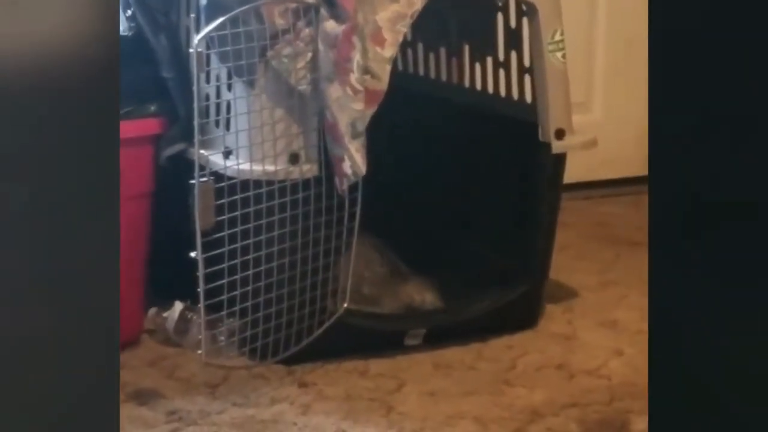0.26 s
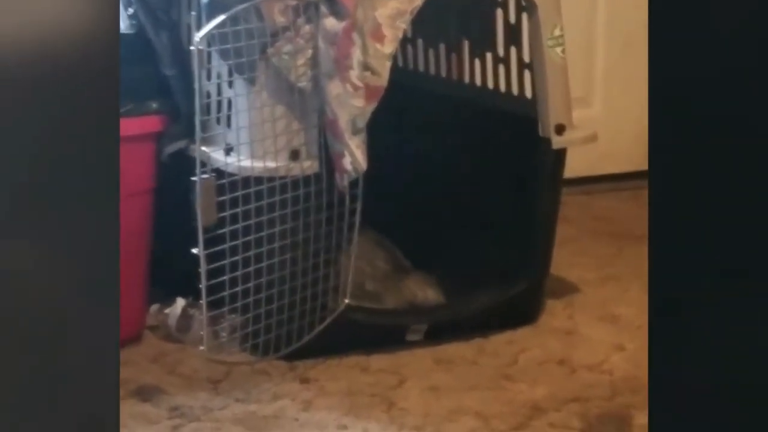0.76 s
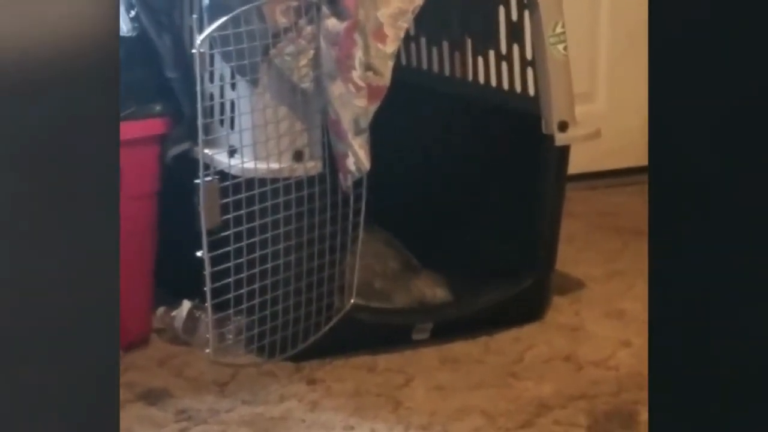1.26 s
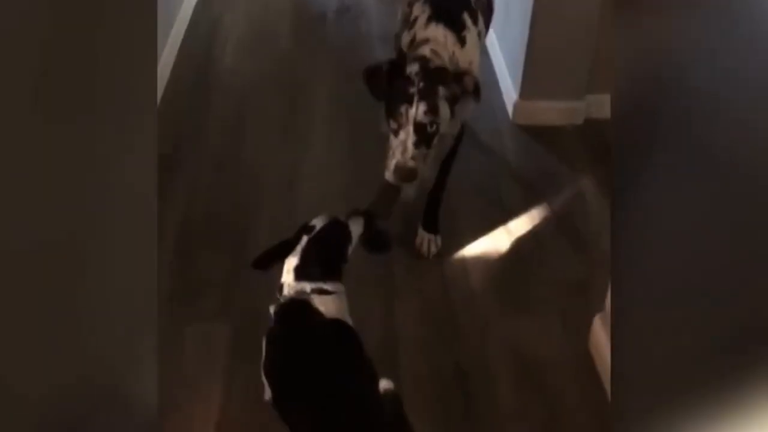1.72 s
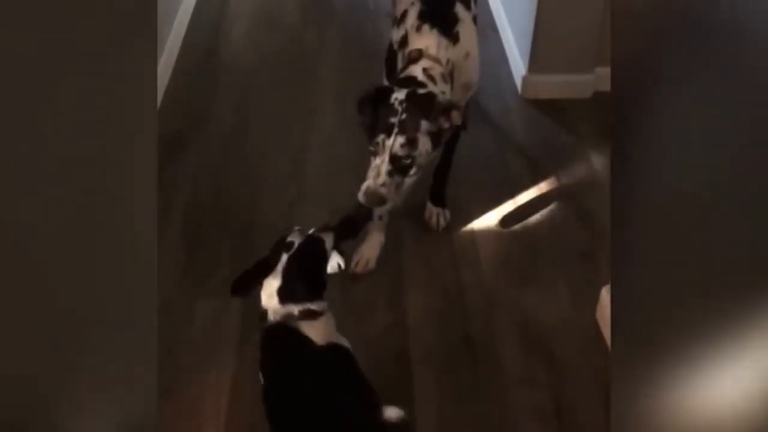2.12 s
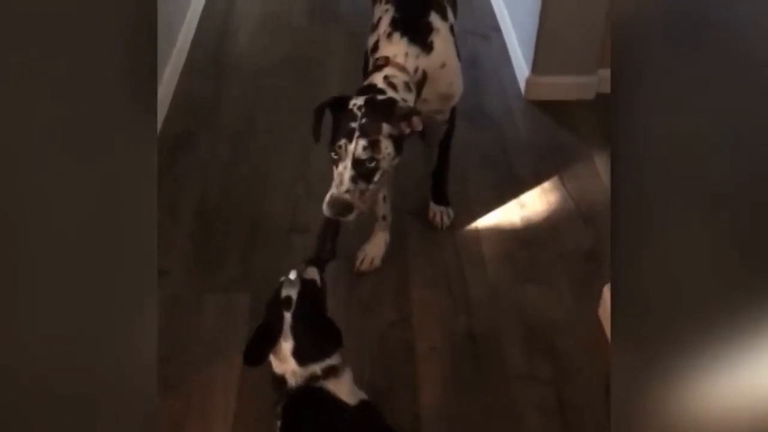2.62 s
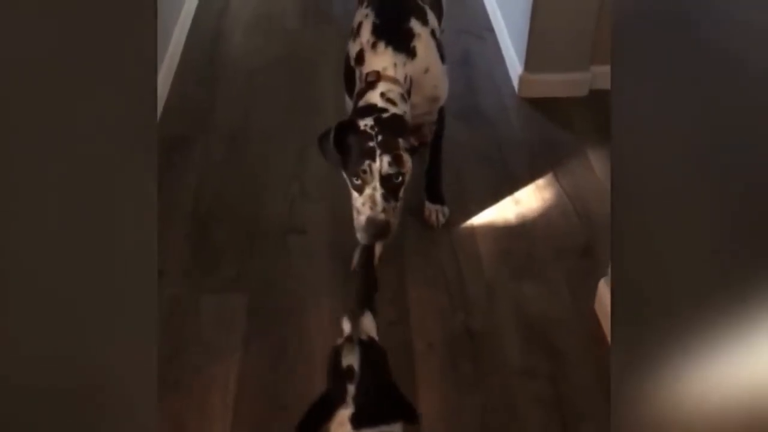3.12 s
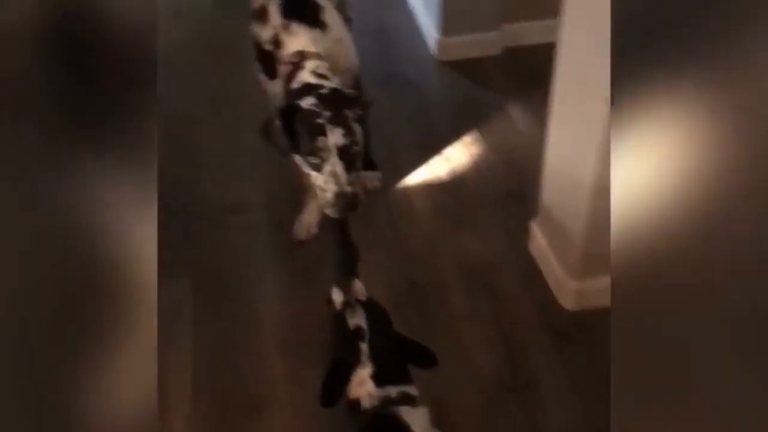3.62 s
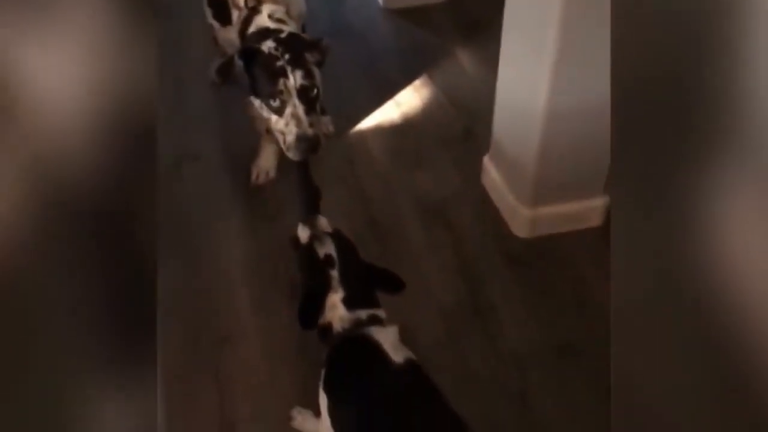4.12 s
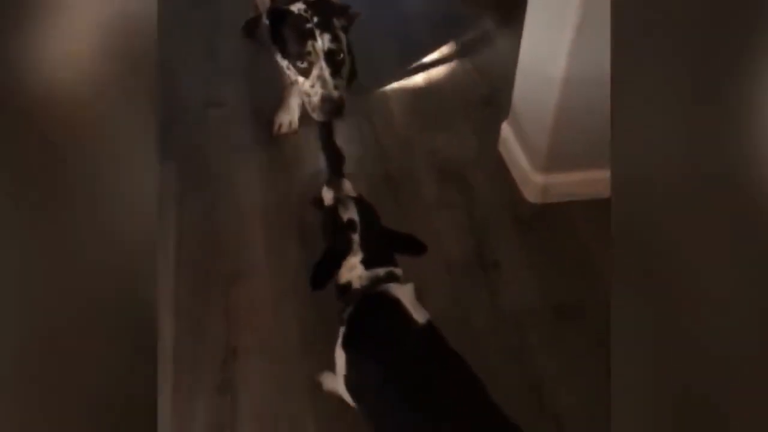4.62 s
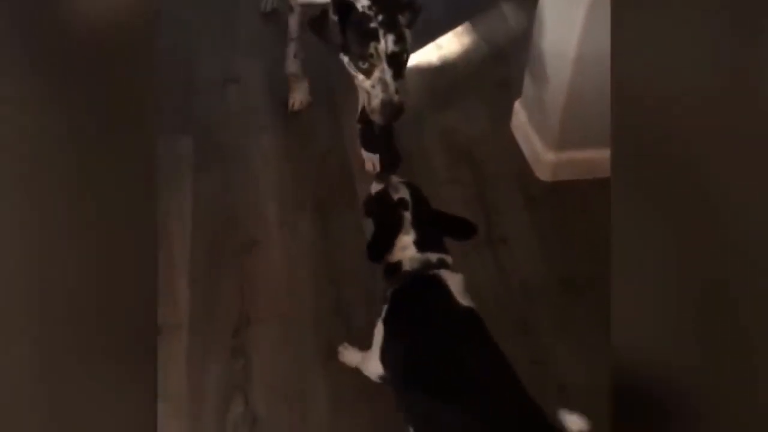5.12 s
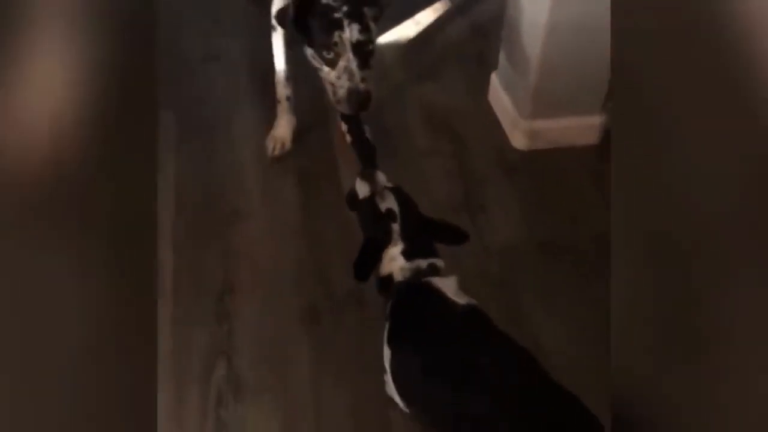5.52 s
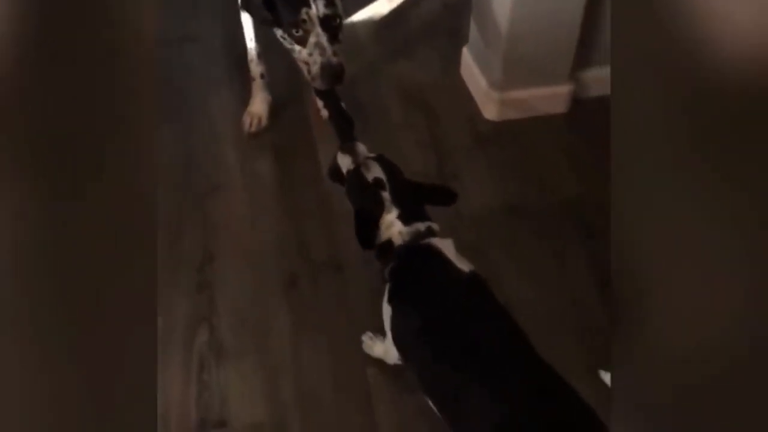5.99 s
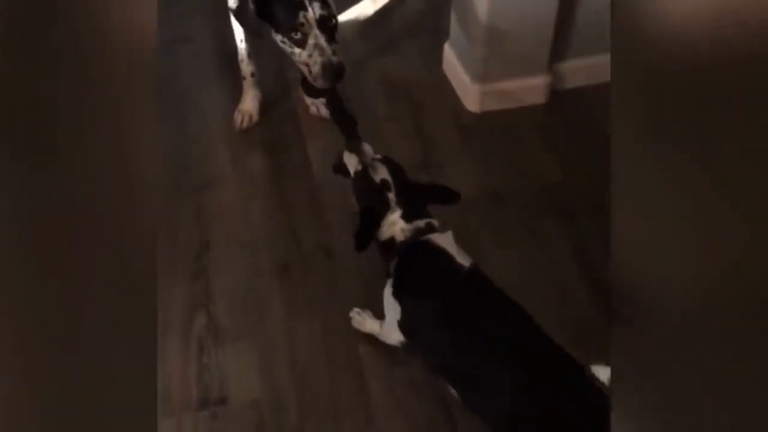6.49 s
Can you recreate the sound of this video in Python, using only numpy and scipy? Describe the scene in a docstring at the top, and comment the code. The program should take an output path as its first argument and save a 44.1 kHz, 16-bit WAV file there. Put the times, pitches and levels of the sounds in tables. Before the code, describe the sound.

A cat meows in a bumped carrier as a toy squeaks, then a big dog growls while tugging a rope, with snorts and claw ticks.

```python
"""A small room with a mains hum, in stereo. Near the microphone, a little left, a cat meows in a carrier
that gets bumped; a little right, a squeezed rubber toy puffs air and squeaks through its reed.
Then another room, in mono, over the rumble of the house: a big dog growls four times through a rope
in its teeth, vocal folds pulsing and soft palate flapping. Two dogs snort with the effort,
claws tick and skid on the boards and a collar tag rings faintly."""
import sys
import numpy as np
from scipy import signal
from scipy.fft import rfft, irfft
from scipy.io import wavfile
from scipy.ndimage import uniform_filter1d

SR = 44100
rng = np.random.default_rng(int(sys.argv[2]) if len(sys.argv) > 2 else 0)


def pcm_store(signal):
    """Save signal as 16-bit PCM."""
    levels = np.round(np.clip(np.atleast_2d(signal), -1, 1) * 32767)
    wavfile.write(sys.argv[1], SR, levels.astype(np.int16).T)


N = 297675
TIME = np.arange(N) / SR


def amp(db):
    return 10 ** (np.asarray(db) / 20)


def unit_rms(x):
    return x / np.sqrt(np.mean(x ** 2) + 1e-20)


def add(mix, start, sound):
    part = mix[round(start * SR):][:len(sound)]
    part += sound[:len(part)]


def controls(rows):
    """Start time, and the other columns sample by sample."""
    times, *columns = np.transpose(rows)
    t = np.arange(times[0], times[-1], 1 / SR)
    return times[0], [np.interp(t, times, column) for column in columns]


def curve_at(points, hz):
    freqs, values = np.transpose(points)
    return np.interp(np.log(hz + 1), np.log(freqs + 1), values)


def noise(shape, size):
    """Noise of rms 1, coloured by (Hz, dB) points."""
    spectrum = rfft(rng.standard_normal(size))
    return unit_rms(irfft(spectrum * amp(curve_at(shape, np.fft.rfftfreq(size, 1 / SR))), size))


def wobble(hz, size):
    """Random drift of rms about 1, mostly slower than hz."""
    knots = rng.standard_normal(int(size / SR * 400) + 400)
    knots = unit_rms(signal.lfilter([1], [1, -np.exp(-2 * np.pi * hz / 400)], knots)[200:])
    return np.interp(np.arange(size) / SR * 400, np.arange(len(knots)), knots)


def resonate(x, hz, width):
    """A resonance that may move: shift hz down to zero, smooth, shift back."""
    turn = np.exp(2j * np.pi * np.cumsum(hz * np.ones(x.shape[-1])) / SR)
    pole = np.exp(-np.pi * width / SR)
    return 2 * (turn * signal.lfilter([1 - pole], [1, -pole], x / turn + 1e-18)).real


def formant(x, hz, width, widen=2):
    """Two resonances in series, for steeper sides."""
    return resonate(resonate(x, hz, width), hz, widen * width)


def hump(hz, centre, width):
    return 1 / (1 + (2 * (hz - centre) / width) ** 2)


def swell(t, middle, half):
    return np.cos(np.pi / 2 * np.clip((t - middle) / half, -1, 1)) ** 2


def ring(db, hz, sag, t60, rise_ms):
    """One dying mode with a soft start."""
    t = np.arange(round(t60 * SR)) / SR
    attack = (1 - np.exp(-t * 1000 / rise_ms)) ** 2
    return amp(db - 60 * t / t60) * attack * np.sin(2 * np.pi * (hz - sag * t / 2) * t)


# Room tone in the small room. Each row: frequency in Hz, relative level in dB.
SMALL_ROOM_TONE = [(18, -31), (40, 1.5), (70, -7.5), (120, -9), (230, 1), (350, -4.5), (500, -20.5),
                   (900, -29), (1700, -24.5), (3000, -37), (16000, -32.5)]

def small_room_tone(hum_hz=120, hum_db=-56.5):
    """Mains hum and rumble in the centre, a faint hiss spread wide."""
    hum = amp(hum_db + 2.4 * wobble(12, N)) * np.sqrt(2) * np.sin(2 * np.pi * hum_hz * TIME)
    rumble = noise(SMALL_ROOM_TONE, N)
    hiss = resonate(np.array([noise(SMALL_ROOM_TONE, N) for _ in range(2)]), 1100, 3800)
    return hum + amp(-67) * (rumble + 2 * hiss)


# The toy's air, close by. Each row: frequency in Hz, relative level in dB.
TOY_AIR = [(300, -27), (1000, 6.5), (2500, 1.5), (5000, 1.5), (8000, -3.5), (12000, -8), (16000, -14.5)]
# Each row: middle of a puff in seconds, half length in seconds, level in dB.
TOY_PUFFS = [(.005, 0.073, -41.5), (0.213, 0.065, -49.5), (0.336, 0.02, -37.5), (0.48, 0.029, -36),
             (0.556, 0.019, -44.5)]

def toy_puffs():
    """Air leaves the toy in puffs that swell and fade."""
    return noise(TOY_AIR, N) * sum(amp(db) * swell(TIME, at, half) for at, half, db in TOY_PUFFS)


# The carrier, dead centre. Each row: start in seconds, level in dB, pitch in Hz,
# sag in Hz per second, seconds to fall 60 dB.
CARRIER_BUMPS = [(0.047, -12.5, 346.4, 1105, 0.2), (0.701, -16.5, 275, 517, 0.063),
                 (1.33, -25.5, 154, 101.1, 0.11)]
# The knock in each bump. Each row: frequency in Hz, relative level in dB.
CARRIER_THUD = [(60, -29), (150, 17.5), (350, 16), (700, 0.5), (1500, -45)]

def carrier_bumps():
    """The bumped carrier knocks dully, and its pitch sags as it rings."""
    bumps, n = np.zeros(N), np.arange(2000)
    envelope = np.exp(-n / 600) * np.minimum(n / 350, 1)
    for start, db, hz, sag, t60 in CARRIER_BUMPS:
        add(bumps, start, ring(db, hz, sag, t60, rise_ms=140 * t60))
        add(bumps, start, amp(db - 20.5) * noise(CARRIER_THUD, len(n)) * envelope)
    return bumps


# The cat, near and left. Each row: time in seconds, pitch in Hz, throat level in dB, mouth level in dB.
CAT_MEOW = [(.05, 359, -58.5, -62.5), (.11, 411.3, -53, -56), (.15, 452, -54, -48.5), (.21, 475, -57, -49),
            (.26, 451, -57, -50.5), (.3, 459, -54.5, -59), (.46, 450.6, -60, -66), (.52, 401, -46, -62),
            (.576, 436.4, -43, -36), (.65, 446.5, -35.5, -32.5), (.72, 452.4, -34.5, -38),
            (.785, 466.3, -53, -37.5), (.845, 445.4, -25.5, -39.5), (.905, 425.8, -43, -33),
            (.97, 416, -29, -49.5), (1.03, 396.3, -26, -52.5), (1.13, 386.6, -29, -46.5),
            (1.2, 367, -37, -48.5), (1.25, 316.8, -36, -67.5), (1.31, 292.9, -49, -65),
            (1.42, 272.8, -62, -100)]

def meow(waver=.003):
    """Harmonics ring the throat and the mouth, whose resonance the opening jaw raises; it ends hoarse."""
    start, (hz, throat_db, mouth_db) = controls(CAT_MEOW)
    size = len(hz)
    t = start + np.arange(size) / SR
    mouth_hz = np.interp(t, (.379, .75, .9, 1.201), (1877, 2120, 2418, 2530))
    mouth_width = np.interp(t, (.75, .9), (1760, 765))
    hoarse = np.interp(t, (1.21, 1.34), (.2, .93))
    jitter = (.0013 + .05 * hoarse ** 2) * wobble(40, size)
    turns = np.cumsum(hz * (1 + jitter + waver * wobble(7, size))) / SR
    # The fundamental thins as the mouth opens, grows with the throat and dies at the end.
    first_db = -49 - .45 * (np.clip(mouth_db, -52, -30) + 43.5) + .25 * (throat_db + 41)
    first_db += 7.7 * hump(hz, 330, 54) - 276 * np.maximum(t - 1.354, 0)
    voice = amp(first_db + 2.5 * wobble(4.6, size)) * np.sin(2 * np.pi * turns)
    for k in range(2, 28):
        f = k * hz
        treble = .0069 * hump(f, 4750, 900) ** 2 + .0017 * hump(f, 6400, 1500) ** 2
        treble *= amp(6.1 * wobble(11, size))
        throat = hump(f, 750, 600) ** 2 + .023 * hump(f, 980, 380) ** 2 + treble
        mouth = hump(f, mouth_hz, mouth_width) ** 2 + amp(-14) * hump(f, 1350, 300) ** 2
        mouth += .013 * hump(f, 6000, 2500) ** 2
        gain = amp(throat_db + .66 * wobble(8.2, size)) * throat
        gain += amp(mouth_db + 8.6 * uniform_filter1d(wobble(18, size), 1500)) * mouth
        voice += gain * np.sin(2 * np.pi * (k * turns + rng.random()))
    air = noise([(200, -6.5), (900, -8), (1800, -8), (2700, 1.5), (3500, -15), (6000, -12.5),
                 (8000, -28.5)], size)
    breath = amp(throat_db - 21) * hoarse * air
    return start, (np.sqrt(2) * voice + breath) * signal.windows.tukey(size, .04)


# The toy, near and right, one list a squeak. Each row: time in seconds, pitch in Hz, level in dB.
TOY_SQUEAKS = [
    [(.055, 914, -54), (.09, 984, -55), (.135, 983, -49.5), (.17, 993, -53.5), (.205, 945, -61),
     (.24, 907, -60.5), (.285, 850, -77)],
    [(.303, 1079, -44), (.32, 1115, -45.5), (.342, 1253, -37.5), (.366, 1333, -36), (.392, 1330, -39.5),
     (.41, 1275, -35), (.44, 1254, -38), (.462, 1157, -40), (.505, 1092, -52.5)],
    [(.515, 1023, -42.5), (.535, 1022, -45), (.63, 1006, -52.5), (.705, 1001, -50.5), (.74, 948, -52),
     (.78, 927, -57)],
    [(1.6, 1196, -106.5), (1.625, 1310, -86), (1.652, 1380, -72.5)],
]
# The reed's colour. Each row: frequency in Hz, gain in dB.
REED_COLOUR = [(1000, -5.5), (1400, -14), (2600, 1.5), (4000, 0), (5300, -4.5), (6500, -7), (9000, -8.5),
               (16000, -11.5)]

def squeak(rows, rasp=.045):
    """The reed buzzes and air hisses past; a harder squeeze makes the overtones shiver more."""
    start, (hz, tone_db) = controls(rows)
    size = len(hz)
    db_per_khz = -.87 - .058 * (tone_db + 45)
    push = 1 + 3.2 * amp(tone_db + 35)
    jitter = (.0024 + .18 * amp(tone_db)) * wobble(93, size)
    turns = np.cumsum(hz * (1 + jitter)) / SR
    reed = np.zeros(size)
    for k in range(1, 17):
        f = k * hz
        db = curve_at(REED_COLOUR, f) + db_per_khz * (f / 1000 - 6) + 3.46 * wobble(30, size)
        shiver = 1 + rasp * push * np.sqrt(k) * wobble(260, size)
        phase = 2 * np.pi * (k * turns + rng.random()) + rasp * push * k * wobble(260, size)
        reed += amp(db) * (f < 17000) * shiver * np.sin(phase)
    leak = amp(-32.5) * push * noise(TOY_AIR, size)
    return start, amp(tone_db) * (np.sqrt(2) * reed + leak) * signal.windows.tukey(size, .07)


def reflections(x, t60, first_ms, channels):
    """The walls return sparse echoes of random sign that die away, each channel its own."""
    at = np.arange(0, SR // 2, 20) + rng.integers(0, 20, (channels, SR // 40 + 1))
    taps = np.zeros((channels, SR // 2 + 20))
    np.put_along_axis(taps, at, rng.choice([-1., 1.], at.shape), 1)
    t = np.arange(taps.shape[1]) / SR
    taps *= amp(-60 * t / t60) * (t > first_ms / 1000)
    return signal.fftconvolve(x[None], taps / np.linalg.norm(taps[0]), axes=1)[:, :N]


def at_microphone(x, left_db, lead):
    """Each microphone port hears a near source with its own level and phase."""
    phase = curve_at(lead, np.fft.rfftfreq(N, 1 / SR))
    sides = np.array([[1], [-1]])
    return irfft(rfft(x) * amp(left_db * sides) * np.exp(.5j * phase * sides), N)


# Cat and toy at the microphone. Each row: frequency in Hz, lead of the left port in radians.
CAT_PHASE = [(100, 0.1), (350, 0.03), (1100, 0.9), (2070, 0.36), (4900, -0.05), (16000, 0.1)]
TOY_PHASE = [(300, -0.2), (1300, 2.1), (2760, .1), (16000, -0.2)]
# The ports' balance. Each row: frequency in Hz, left over right in dB.
PORT_BALANCE = [(200, -4), (600, 5.5), (1300, 1), (4000, 0), (8000, -10.5), (15000, 0)]

def small_room():
    """The first room in stereo: cat left, toy right, the walls close behind them."""
    cat, toy = np.zeros((2, N))
    add(cat, *meow())
    for rows in TOY_SQUEAKS:
        add(toy, *squeak(rows))
    toy += toy_puffs()
    background = carrier_bumps() + small_room_tone()
    direct = at_microphone(cat, .76, CAT_PHASE) + at_microphone(toy, -1.5, TOY_PHASE)
    walls = reflections(cat, t60=.23, first_ms=1.5, channels=2)
    walls += reflections(toy, t60=.23, first_ms=3.1, channels=2)
    balance_db = curve_at(PORT_BALANCE, np.fft.rfftfreq(N, 1 / SR)) * [[.5], [-.5]]
    return irfft(rfft(direct + amp(-5.5) * walls) * amp(balance_db), N) + background


# The house, heard from the second room. Each row: frequency in Hz, relative level in dB.
HOUSE_RUMBLE = [(15, -52), (30, -60), (55, -3.5), (90, -16), (125, 1), (170, -2.5), (245, -15.5),
                (330, -18), (480, -28), (900, -24), (2000, -35), (5000, -42.5), (11000, -51), (16000, -86)]
# Each row: frequency of a mains tone in Hz, level in dB.
MAINS_TONES = [(60, -69.5), (119, -68.5), (237, -70.5), (352, -79.5), (411, -85)]

def house_tone():
    """The house rumbles under wavering mains tones."""
    rumble = amp(-58.5) * noise(HOUSE_RUMBLE, N)
    hum = sum(amp(db + 5 * wobble(16, N)) * np.sin(2 * np.pi * hz * TIME) for hz, db in MAINS_TONES)
    return rumble + hum


# Down on the boards. Each row: start in seconds, level in dB, resonance in Hz.
CLAW_TICKS = [(1.7, -54, 5500), (1.732, -59, 4260), (1.889, -56, 9000), (1.918, -48, 7840),
              (1.9587, -47.5, 4150), (2.921, -56, 4560), (3.5742, -52, 2770), (3.922, -69, 2750),
              (4.67, -59, 7000), (4.77, -46, 8640), (5.1251, -57, 5070), (5.271, -69, 7950),
              (5.281, -61, 7500), (5.529, -46, 6200), (5.574, -58, 5700), (5.692, -44.5, 2540)]

def claw_tick(db, hz):
    """A claw strikes a board: a tiny burst of noise through a broad resonance."""
    n = np.arange(400)
    strike = rng.standard_normal(400) * n * np.exp(-n / 30)
    return amp(db - 8.5) * unit_rms(formant(strike, hz, .45 * hz, widen=4 / 3))


# Both dogs. Each row: start in seconds, rise in seconds, level at the top in dB, fall in dB per second,
# treble over the body in dB, pitch of the air jet in Hz.
DOG_SNORTS = [(1.701, 0.036, -63, 609, -21, 2980), (1.79, 0.0061, -67.5, 115.5, -6.5, 6000),
              (1.887, 0.011, -56, 123.5, -6, 3650), (2.207, 0.011, -57.5, 60, -5, 3750),
              (2.478, 0.021, -51, 132.5, -5, 3850), (2.589, 0.028, -53, 152, -22, 5730),
              (2.799, 0.018, -56, 136, -5, 3800), (3.06, 0.0023, -68, 367.5, -11, 4500),
              (3.144, 0.016, -52.5, 116.5, -6, 4350), (3.322, 0.028, -58, 126, -2, 3150),
              (4.668, 0.012, -57.5, 192, -30, 5400), (4.771, 0.0047, -55, 129.5, -6.5, 4760),
              (5.047, 0.029, -62.5, 163.5, -8, 3420), (5.332, 0.07, -48.5, 104, -2.3, 6200),
              (5.626, 0.019, -58.5, 155, -8, 5600), (5.98, 0.064, -68.5, 170, -5, 5310),
              (6.5, 0.036, -70, 35, -6, 4020), (6.663, 0.0064, -60.5, 155.5, -38, 4370)]
# Each row: nostril resonance in Hz, width in Hz, relative level in dB.
NOSTRIL_FORMANTS = [(3140, 1100, 25), (4354, 610, 21.5), (2036, 1260, 15), (5140, 530, 19), (6080, 530, 18),
                    (8160, 190, 15), (920, 220, 22.5), (3800, 430, 20.5)]
# The treble of a snort. Each row: frequency in Hz, relative level in dB.
SNORT_FIZZ = [(3000, -67), (5500, -7.5), (7000, -8.5), (10000, -14.5), (16000, -33)]

def snort(rise, top_db, fall, colour_db, jet_hz):
    """Turbulent air forced through the nostrils climbs, holds briefly and falls, growing duller."""
    hold_end = 1.44 * rise
    t = np.arange(0, hold_end + 35.5 / fall, 1 / SR)  # until 35.5 dB down
    size = len(t)
    effort_db = top_db - 296 * np.maximum(rise - t, 0) - fall * np.maximum(t - hold_end, 0)
    bright_db = 12 * np.exp(-(t + rise) / .019) - 95 * np.maximum(t - rise, 0)
    white = rng.standard_normal(size)
    drift = 1 + .036 * wobble(2.9, size)
    nostrils = sum(amp(db) * formant(white, hz * drift, width) for hz, width, db in NOSTRIL_FORMANTS)
    jet = amp(bright_db - 13) * unit_rms(formant(white[::-1], jet_hz, 1050, widen=1))
    body = (unit_rms(nostrils) + jet) * amp(3 * wobble(90, size))
    fizz = noise(SNORT_FIZZ, size) * amp(colour_db + bright_db + 2.2 * wobble(60, size))
    n = np.arange(size)
    fades = np.clip(np.minimum(n / 80, n[::-1] / 300), 0, 1)
    return amp(effort_db) * (body + fizz) * fades


# At the collar, faint. Each row: start in seconds, level in dB.
TAG_CLINKS = [(1.989, -66), (2.045, -68), (2.39, -66)]

def collar_tag(db):
    """The tag rings in one high, brief mode."""
    return ring(db, hz=10050, sag=0, t60=.1, rise_ms=1)


# The big dog's throat. Each row: resonance in Hz, width in Hz, relative level in dB.
THROAT_FORMANTS = [(580, 104, -11), (696.5, 133, 0.5), (876, 145, 2.5), (1435, 430, -20),
                   (3200, 1100, -23.5)]

def dog_throat(drive, snarl_db, shift, tongue_hz, tongue_db):
    """Throat and tongue resonances, moved by the factor shift; a snarl lifts the third."""
    bands = THROAT_FORMANTS + [(tongue_hz, 240, tongue_db - 13.5)]
    parts = [amp(db) * unit_rms(formant(drive, hz * shift, width)) for hz, width, db in bands]
    parts[2] *= amp(snarl_db)
    power = sum(amp(2 * db) for _, _, db in THROAT_FORMANTS) + amp(2 * snarl_db) - 1
    return sum(parts) / np.sqrt(power)


# The big dog on the rope, one list a growl. Each row: time in seconds, effort in dB,
# pitch of the folds in Hz, snarl in dB.
DOG_GROWLS = [
    [(1.99, -89, 91.83, 30), (2.05, -50, 95.1, 20), (2.15, -46.5, 103.7, 2.5), (2.25, -50, 111.1, 6),
     (2.35, -48, 107.6, 6), (2.45, -43.5, 104.5, 3.5), (2.58, -47, 107.2, 4), (2.78, -47, 104.2, 3),
     (2.98, -60.5, 92.96, 4)],
    [(3.21, -66, 114.1, 11), (3.25, -54, 108.5, -3.5), (3.6, -55.5, 92.9, -1), (3.99, -56.5, 84.3, 0.5),
     (4.07, -80, 86.2, 6)],
    [(4.62, -54, 86.4, 7), (4.65, -53.5, 90.2, 4.5), (4.77, -53.5, 102.9, -4.5), (5.0, -51.5, 93.9, 4),
     (5.28, -48.5, 94, 5.5), (5.45, -50.5, 112.1, -3), (5.6, -65.5, 115, 2)],
    [(5.96, -65, 87.4, 6), (6.02, -58, 87.24, 1), (6.43, -54.5, 91.1, -1.5), (6.55, -53, 103.9, 0.5),
     (6.75, -55.5, 98.1, -2)],
]
# One row a growl. Each row: share of puffs against clean pulses, palate flaps a second,
# time of one flap in seconds, flap depth from 0 to 1, tongue resonance in Hz, its lift in dB,
# nose resonance in Hz, factor on the throat resonances.
GROWL_VOICES = [(0.7, 20.8, 2.134, 0.23, 1324, 6.5, 2520, 0.948),
                (0.77, 33, 4.3, 0.46, 1180, 10, 1920, 0.988), (0.74, 20.5, 3, 0.29, 1250, 4, 2180, 1.014),
                (0.81, 24, 5.2, 0.23, 1066, 9.5, 1880, 1.033)]
# The octave swells or dips once a growl. Each row: middle in seconds, half length in seconds, lift in dB.
OCTAVE_SWELLS = [(2.523, 0.31, 18), (3.831, 0.28, 11), (5.0, 0.46, -11), (6.394, 0.28, 7.5)]

def growl(rows, rough, flap_hz, flap_at, depth, tongue_hz, tongue_db, nose_hz, shape):
    """Uneven fold pulses and puffs, throbbing with the palate, ring throat and nose; the chest hums."""
    start, (effort_db, hz, snarl_db) = controls(rows)
    size = len(hz)
    t = start + np.arange(size) / SR
    turns = np.cumsum(hz * (1 + .032 * wobble(40, size))) / SR
    cycle = turns.astype(int)
    pulse_force = amp(1.2 * rng.standard_normal(cycle[-1] + 1))[cycle]
    flap_phase = (flap_hz * (t - flap_at) + .021 * wobble(5.1, size)) % 1
    throb = 1 - depth + 2 * depth * np.exp(-flap_phase / .33)  # the airway snaps open, then narrows
    pulses = uniform_filter1d(np.diff(cycle, prepend=0) * 1., 22)  # soft folds close slowly
    puffs = (.45 + np.exp(-(turns % 1) / .3)) * rng.standard_normal(size)
    drive = throb * pulse_force * ((1 - rough) * unit_rms(pulses) + rough * unit_rms(puffs))
    soft_tissue = signal.butter(4, [330, 3800], "band", fs=SR, output="sos")
    drive = signal.sosfilt(soft_tissue, drive)

    nose = unit_rms(formant(drive, nose_hz * (1 + .13 * wobble(2.6, size)), 480))
    nose_db = -68.5 + .063 * (effort_db + 50) - 1.42 * snarl_db  # a snarl closes the nose
    hum = np.sqrt(2) * np.sin(2 * np.pi * uniform_filter1d(turns, 900))
    hum *= amp(3.2 * wobble(21, size)) * uniform_filter1d(throb, 900)
    rumble = .5 * noise([(60, -24), (100, 2), (170, 8), (300, 6), (430, -33.5)], size)
    octave_db = -15 + sum(db * swell(t, at, half) for at, half, db in OCTAVE_SWELLS)
    octave = np.sqrt(2) * amp(octave_db + 2.5 * wobble(20, size)) * np.sin(4 * np.pi * turns)
    chest = amp(-52.5 + .48 * (effort_db + 50)) * (hum + rumble + octave)
    shift = shape + .0041 * (effort_db - np.median(effort_db)) + .052 * wobble(6.2, size)
    throat = amp(effort_db) * dog_throat(drive, snarl_db, shift, tongue_hz, tongue_db)
    return start, (throat + amp(nose_db) * nose + chest) * signal.windows.tukey(size, .05)


# The hardest flaps within the growls. Each row: start in seconds, level in dB.
PALATE_SLAPS = [(2.016, -40.5), (2.043, -34), (2.053, -37), (2.076, -29), (2.137, -33), (2.176, -37),
                (2.255, -40), (2.279, -31), (2.679, -35.5), (3.284, -39.5), (3.636, -44), (3.69, -40),
                (3.734, -39.5), (3.779, -35), (3.927, -36.5), (4.639, -36), (4.942, -38), (5.334, -39),
                (6.026, -35), (6.073, -36.5), (6.12, -40)]

def palate_slap(db):
    """The soft palate slaps one hard, short puff into the throat."""
    t = np.arange(1500) / SR
    puff = uniform_filter1d(rng.standard_normal(len(t)), 12) * t * np.exp(-t / .00048)
    slap = dog_throat(puff, snarl_db=0, shift=1, tongue_hz=1140, tongue_db=.58)
    return amp(db - 4.5) * slap / abs(slap).max()


# Down on the boards. Each row: start in seconds, length in seconds, pitch in Hz,
# glide in Hz per second, level in dB.
CLAW_SKIDS = [(2.597, 0.031, 4760, 18, -56), (2.6, 0.031, 5160, 32000, -52.5), (2.6, .03, 7200, 0, -60),
              (4.678, .022, 5360, 0, -71), (4.79, 0.032, 2970, 0, -67), (6.659, 0.032, 2910, -3000, -60),
              (6.66, 0.035, 4390, 0, -59)]

def claw_skid(length, hz, glide, db):
    """A sliding claw squeals in a short, fuzzy whistle."""
    t = np.arange(0, length, 1 / SR)
    squeal = formant(rng.standard_normal(len(t)), hz + glide * t, 330, widen=3)
    return amp(db) * unit_rms(squeal) * signal.windows.tukey(len(t), .4)


def dog_room():
    """The second room in mono: dogs, claws and tag with a short tail, over the sound of the house."""
    dogs = np.zeros(N)
    for rows, voice in zip(DOG_GROWLS, GROWL_VOICES):
        add(dogs, *growl(rows, *voice))
    for source, rows in [(palate_slap, PALATE_SLAPS), (snort, DOG_SNORTS), (claw_tick, CLAW_TICKS),
                         (claw_skid, CLAW_SKIDS), (collar_tag, TAG_CLINKS)]:
        for start, *settings in rows:
            add(dogs, start, source(*settings))
    thinned = dogs - resonate(dogs, 90, 250)  # little bass comes back from the walls
    walls = reflections(thinned, t60=.28, first_ms=4, channels=1)[0]
    return dogs + amp(-7) * walls + house_tone()


def scene(cut_s=1.652):
    """A hard cut from the cat's room to the dogs'."""
    second = np.clip((TIME - cut_s) / .004, 0, 1)
    return (1 - second) * small_room() + second * dog_room()


def record(dry):
    """Both channels roll off steeply at 15.8 kHz."""
    lowpass = signal.firwin(511, 15800, window=("kaiser", 9), fs=SR)
    return signal.oaconvolve(dry, lowpass[None], "same")


dry = scene()
out = record(dry)
pcm_store(out)
```